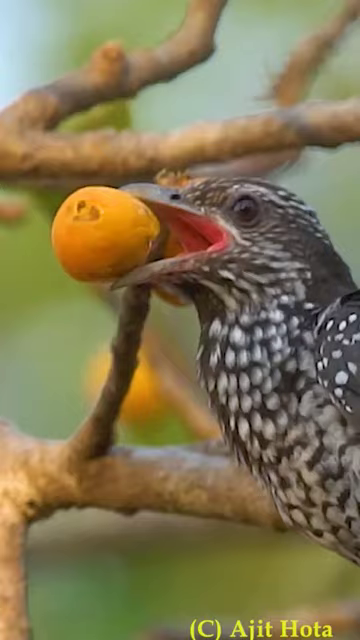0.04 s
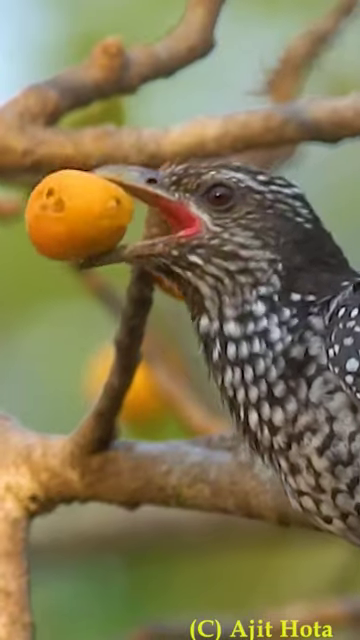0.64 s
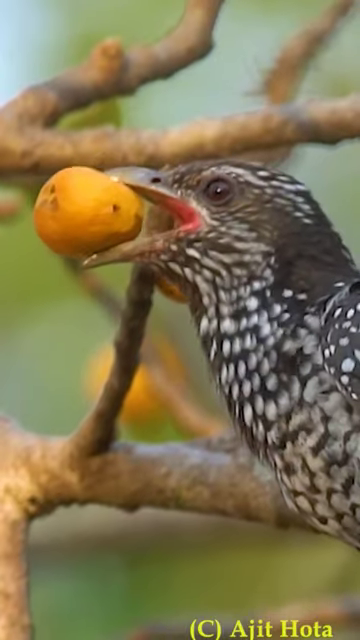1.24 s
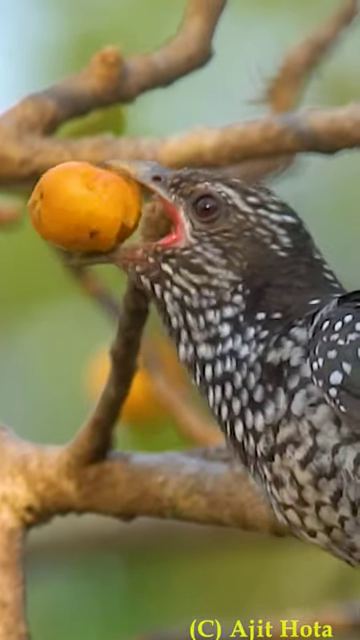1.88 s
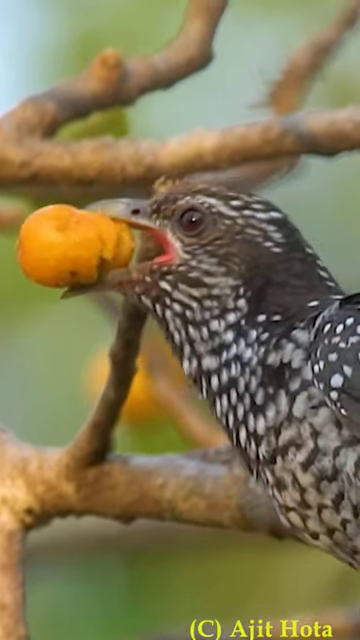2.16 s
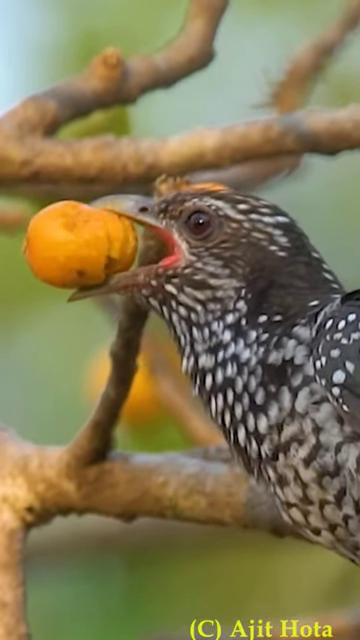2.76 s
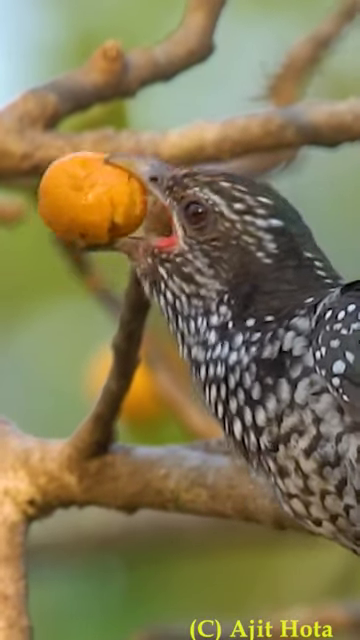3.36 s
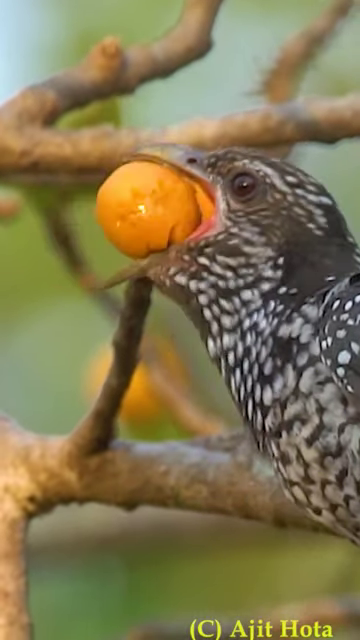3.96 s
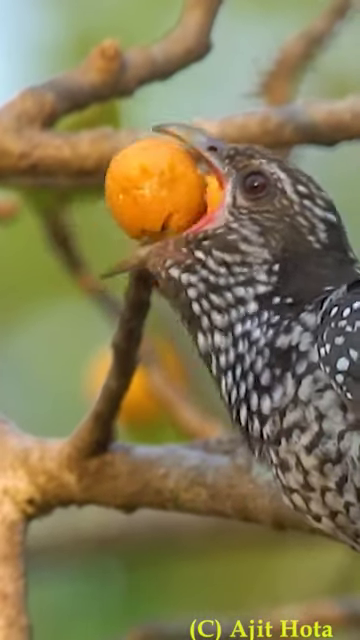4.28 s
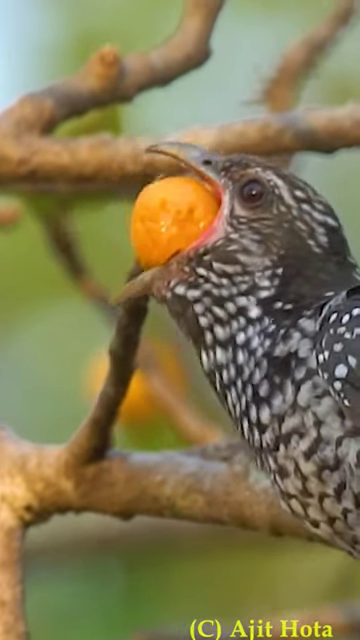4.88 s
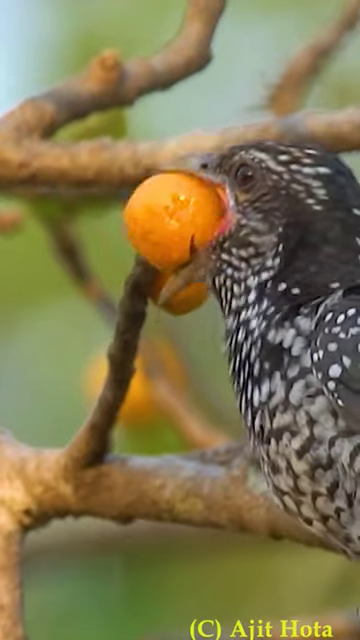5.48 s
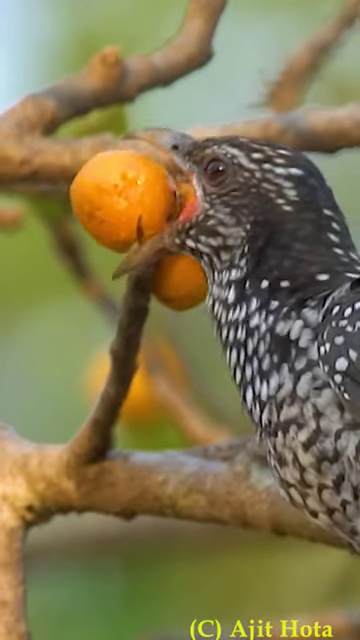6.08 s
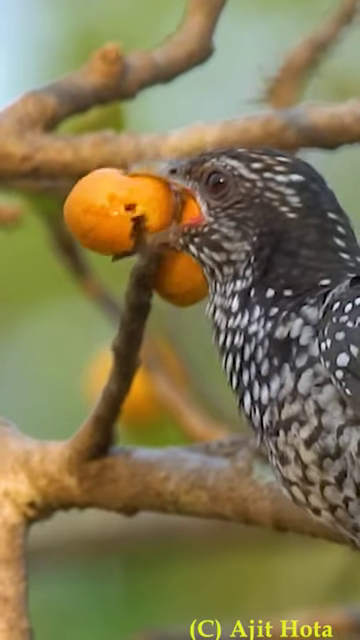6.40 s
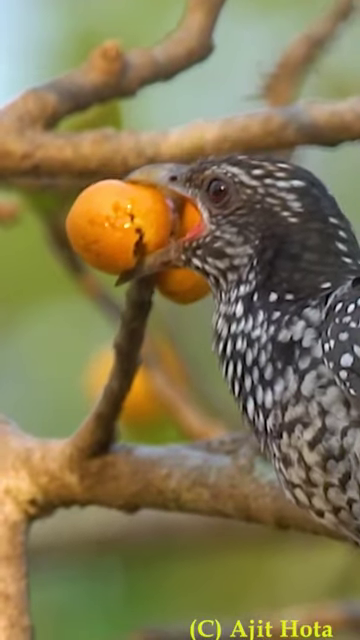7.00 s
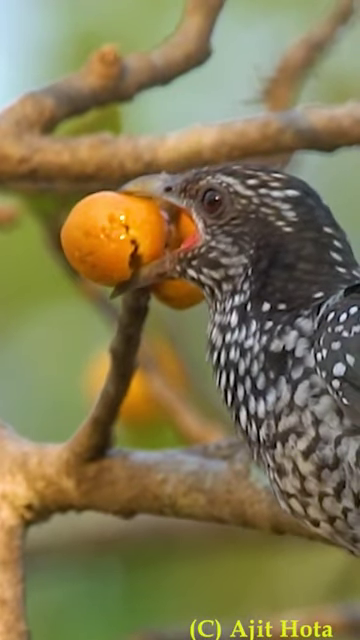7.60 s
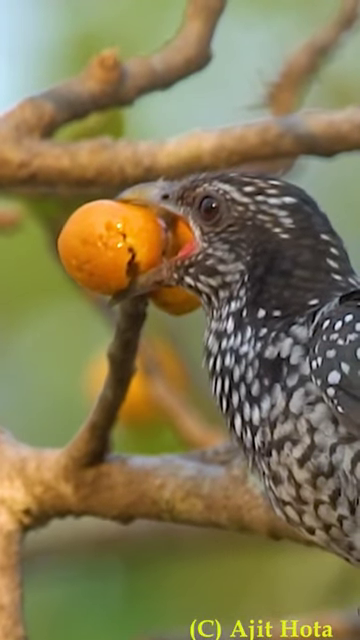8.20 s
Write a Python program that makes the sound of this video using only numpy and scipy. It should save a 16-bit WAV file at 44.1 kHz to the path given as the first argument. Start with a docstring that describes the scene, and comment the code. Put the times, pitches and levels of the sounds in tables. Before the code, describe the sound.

A cricket close by chirps quickly, pauses for several seconds, then returns with a longer run. Other crickets answer from farther off over a steady high insect chorus and hiss. Songbirds slur faint whistles among the trees, and long falling calls echo early and again late. One short low cluck comes midway, and a few dry ticks and soft rustles follow as a bird turns a fruit in its bill.

```python
"""A near cricket chirps in bouts, each chirp four falling strokes of scraper on file, in woodland where a
bird turns a fruit in its bill. Other crickets answer from farther off. Songbirds slur whistles among the
trees, and long falling calls echo off trunks and leaves. One low cluck, a few sharp ticks and soft puffs
of rustling sit on a bed of background hiss, a far hum and a steady insect chorus."""
import sys
import numpy as np
from scipy import signal
from scipy.fft import rfft, irfft
from scipy.io import wavfile
from scipy.ndimage import map_coordinates

SR = 44100
rng = np.random.default_rng(int(sys.argv[2]) if len(sys.argv) > 2 else 0)


def store_wav(level_fs):
    """Save 16-bit WAV to argv[1]."""
    pcm = np.round(np.clip(np.atleast_2d(level_fs), -1, 1) * 32767)
    wavfile.write(sys.argv[1], SR, pcm.T.astype(np.int16))


N = 363825
TIME = np.arange(N) / SR
FREQS = np.maximum(np.fft.rfftfreq(N, 1 / SR), 1)

# Levels are set ahead of each layer's own gain; pan is left minus right.
# near cricket's chirps: t/s of the first full stroke, stroke spacing/s, level/dB
NEAR_CHIRPS = [(.0892, .0358, -27.2), (.3497, .038, -27.7), (4.8025, .038, -29), (5.0717, .0358, -27.7),
               (5.335, .036, -28.3), (5.597, .036, -28.2), (5.8588, .0372, -28.7), (6.1558, .0366, -27.4)]
# higher cricket's chirps: t/s
HIGH_CHIRPS = [0.559, 1.476, 2.400, 3.278, 4.282, 5.278, 6.306, 7.219, 8.081]
# far cricket's bouts: start/s, end/s
FAR_BOUTS = [(.548, 1.55), (1.933, 2.95), (7.027, 8.25)]
# a small insect's thin double chips: t/s
INSECT_CHIPS = [1.604, 3.831, 4.32, 4.87, 5.473, 6.073, 6.703, 7.84]
# songbird slurs: t/s, length/s, start f/Hz, middle f/Hz, end f/Hz, level/dB, pan/dB
WHISTLES = [(0.061, 0.12, 2250, 2180, 2115, -55, 2), (0.103, 0.18, 2000, 1932, 1897, -54.5, 8),
            (0.323, .19, 2400, 2760, 2810, -59, 8), (0.511, 0.18, 3200, 3166, 3000, -60.5, 0),
            (.57, 0.054, 1800, 1747, 1730, -62, 0), (0.628, 0.29, 2950, 2866, 2730, -58.5, -8),
            (0.859, 0.063, 2800, 2650, 2330, -60, -4), (0.901, 0.089, 1810, 1764, 1680, -57.5, -2),
            (1.01, 0.13, 1330, 1471, 1360, -58, 10.5), (1.078, 0.19, 4060, 3940, 3930, -56.5, -2),
            (1.267, 0.19, 1800, 1880, 1890, -59.5, 7), (1.517, 0.072, 2835, 2560, 2470, -58, -3),
            (1.606, 0.06, 1480, 1364, 1240, -58, 8), (2.455, 0.12, 2050, 2216, 2215, -60, -6),
            (2.645, 0.07, 2048, 1762, 1490, -59, 0), (3.54, 0.4, 2232, 2777, 2470, -57.5, -8.5),
            (3.81, 0.15, 1800, 1858, 1814, -60.5, 0), (3.891, 0.047, 2550, 2880, 3060, -56, 5),
            (3.987, 0.049, 2800, 2680, 2580, -58, -9), (4.053, 0.16, 2860, 2600, 2633, -57.5, -13),
            (4.24, 0.24, 1690, 1927, 1974, -61, -1), (4.417, 0.28, 2300, 2625, 2510, -58, -9),
            (4.671, 0.11, 2620, 2382, 2130, -53.5, -13), (4.927, 0.12, 1780, 2020, 2095, -63, -6),
            (5.206, 0.12, 2080, 2480, 2550, -60, -15), (5.27, 0.19, 1280, 1416, 1486, -67.5, 6),
            (5.406, 0.13, 1700, 1990, 1815, -60.5, 0), (5.86, 0.14, 1400, 1507, 1500, -62.5, 8),
            (6.088, 0.057, 2600, 2800, 3160, -56, 6), (6.109, 0.18, 1790, 1963, 1930, -55.5, 2),
            (6.245, 0.14, 2843, 2596, 2610, -60, -2), (6.735, 0.11, 1850, 1820, 1790, -61, 4),
            (6.881, 0.065, 2750, 2704, 2735, -54.5, 0)]
# hoarse bird chirps that drop onto a low pitch: t/s, length/s, end f/Hz, level/dB
LOW_CHIRPS = [(1.479, 0.058, 990, -65.5), (6.42, 0.022, 1540, -59), (6.45, 0.034, 1185, -60),
              (6.55, 0.043, 1400, -59.5), (7.137, 0.014, 1503, -59), (7.167, 0.044, 1155, -59.5),
              (7.262, 0.041, 1367, -58), (7.303, 0.033, 2220, -58.5), (7.597, 0.058, 1870, -53),
              (7.86, 0.048, 1826, -53.5)]
# falling calls deep in the trees, one curve each: t/s, f/Hz, level/dB
FALLING_CALLS = [
    [(.63, 5700, -53), (.70, 4850, -48), (.82, 4080, -46), (.89, 3530, -49.5), (1.02, 3380, -64)],
    [(1.14, 3570, -51), (1.22, 3443, -45.5), (1.33, 3327, -46), (1.46, 3207, -41), (1.56, 2950, -47)],
    [(6.36, 5260, -47), (6.46, 4910, -44), (6.56, 4230, -33), (6.66, 3385, -44), (6.79, 3000, -49),
     (6.94, 2670, -60)],
]
# how each falling call carries: rasp/share of pitch, direct level/dB, echo t60/s
CALL_VOICES = [(0.057, -12, 1.4), (0.0127, -7, 1.17), (.04, -10, 1.86)]
# the cluck's harmonics, from the first up: level/dB
CLUCK_HARMONICS = [-11.5, 0, 0.5, -15]
# sharp ticks: t/s, level/dB, pan/dB
TICKS = [(2.326, -35, -9), (5.916, -39, 0), (6.048, -40.5, -6), (6.42, -45, -5), (6.823, -38.5, -2),
         (7.212, -39, 4), (7.654, -41, -6)]
# puffs of rustling: t/s, body level/dB, brush offset/dB
RUSTLE_PUFFS = [(2.35, -73.5, -4), (2.78, -69, -5), (3.08, -73, 3), (3.67, -70.5, -22), (3.87, -67.5, -4.5),
                (4.35, -75, -16), (4.99, -71.5, -10), (5.63, -75, 2), (6.05, -66.5, -6), (6.22, -71.5, -14),
                (6.30, -70.5, 1), (6.48, -72, -0.5), (6.57, -70.5, -3), (6.67, -66, -5), (6.82, -70, -4),
                (6.98, -67.5, -1), (7.22, -68, -5), (7.41, -67.5, -2), (7.71, -67, -6), (7.94, -71, 1.5)]
# tone of the background hiss: f/Hz, level/dB
HISS_SPECTRUM = [(25, -4.5), (100, -4.5), (300, -2), (450, -3), (800, -2.5), (1300, -1), (2000, 2.5),
                 (3400, 1.5), (4800, 0.5), (6500, -1), (8600, -4.5), (9100, -5.5), (13000, -11),
                 (15600, -15.5)]
# stereo image of the hiss: f/Hz, left-right correlation
HISS_CORRELATION = [(60, -0.11), (1400, 0.26), (3100, -0.2), (7000, 0.028)]
# level ride on the hiss, used about its mean and strongest in the treble: t/s, level/dB
HISS_SWELL = [(0.3, -62.5), (0.74, -65.5), (1.05, -64), (2.62, -62), (3.29, -57), (3.64, -62),
              (6.43, -63.5), (6.81, -61), (7.05, -60.5), (8.25, -65)]
# steady bands, a far hum and then the insect chorus: f/Hz, width/Hz, level/dB, left-right correlation
CHORUS_BANDS = [(537.6, 70, -65, 0.34), (4167, 460, -48.2, -0.34), (4770, 270, -58, -0.28),
                (5417, 310, -55.5, -0.14), (7953, 595, -54, 0.11), (11800, 1100, -65.5, -0.022)]


def near_cricket(stroke_s=.017, weak_stroke_db=-11, shortfall_kept=.15):
    """Swelling chirps off to the left; a faint low falling tone, like distortion, under each stroke."""
    song, undertone = np.zeros((2, N)), np.zeros((2, N))
    for full_stroke_s, gap_s, peak_db in NEAR_CHIRPS:
        for k in range(4):
            s = full_stroke_s + (k - 1) * gap_s - .0046
            db = peak_db + weak_stroke_db * shortfall_kept ** k  # opens weak, then fills out
            add(song, s, from_db(db) * falling_tone(hz=4227, fall_hz=547, length_s=stroke_s, lead=-1.1))
            low_tone = falling_tone(hz=317, fall_hz=480, length_s=stroke_s, lead=.55)
            add(undertone, s, from_db(db - 20) * low_tone)
    direct = song + undertone
    echoes = wood_echo(direct[0], t60=.075, build_s=.001)
    return from_db(-2.5) * direct * panned(4.5) + from_db(-7.5) * echoes * panned(-2)


def falling_tone(hz, fall_hz, length_s, lead):
    """A pip that sags, as a wing stroke does when the file slows; left is ahead by lead radians."""
    u = np.linspace(0, 1, int(length_s * SR))
    pitch = (hz + fall_hz * (.5 - u)) * (1 + .005 * wander(len(u), 600))
    phase = 2 * np.pi * (np.cumsum(pitch) / SR + rng.random())
    grain = from_db(1.2 * wander(len(u), 500))  # in a wing stroke, the scraper's uneven grip
    envelope = np.sin(np.pi * u) ** 1.1 * grain
    return envelope * np.sin(phase + np.array([[lead], [0]]))


def stridulation(starts, db, strokes, gap_s, wet_db, **stroke):
    """Chirps made of short rows of nearly equal wing strokes, with a tight echo."""
    out = np.zeros((2, N))
    for s in starts:
        for k in range(strokes):
            add(out, s + k * gap_s, from_db(db + rng.normal(0, 1)) * falling_tone(**stroke))
    return out + from_db(wet_db) * wood_echo(out[0], t60=.075, build_s=.0052)


def answering_insects(far_period_s=.289, aside_rad=2.7):
    """Two crickets far off to one side, nearly out of phase left to right, and a small insect's chips."""
    high = stridulation(HIGH_CHIRPS, db=-40.5, strokes=4, gap_s=.0405, wet_db=-7,
                        hz=5610, fall_hz=593, length_s=.0175, lead=aside_rad)
    far_chirps = np.concatenate([np.arange(start, end, far_period_s) for start, end in FAR_BOUTS])
    far = stridulation(far_chirps, db=-43, strokes=2, gap_s=.024, wet_db=-9.5,
                       hz=4630, fall_hz=450, length_s=.02, lead=aside_rad)
    chips = stridulation(INSECT_CHIPS, db=-52.5, strokes=2, gap_s=.031, wet_db=4.5,
                         hz=7460, fall_hz=905, length_s=.0275, lead=.59)
    return high + far * panned(-3.2) + chips


def songbirds(chirp_drop=.154):
    """Slurred whistles from both sides and short low chirps, ringing through the wood."""
    song, chirps = np.zeros((2, N)), np.zeros((2, N))
    for s, length_s, from_hz, middle_hz, to_hz, db, pan_db in WHISTLES:
        add(song, s, from_db(db) * panned(pan_db) * whistle(length_s, from_hz, middle_hz, to_hz))
    for s, length_s, hz, db in LOW_CHIRPS:
        chirp = whistle(length_s, hz * (1 + chirp_drop), hz * (1 + chirp_drop / 4), hz, rasp=.073)
        add(chirps, s, from_db(db) * chirp)
    send = from_db(-.6) * song.mean(0) + from_db(-2) * chirps.mean(0)
    echo = wood_echo(send, t60=1.0, build_s=.0026)
    return from_db(7) * (from_db(-.5) * (song + chirps) + echo)


def whistle(length_s, from_hz, middle_hz, to_hz, waver=.0119, rasp=.035, flutter_db=3.5):
    """A wavering note arcing through three pitches, hoarse where it slides steeply."""
    u = np.linspace(-1, 1, max(int(length_s * SR), 64))
    arc = middle_hz + (to_hz - from_hz) / 2 * u + ((to_hz + from_hz) / 2 - middle_hz) * u ** 2
    steepness = np.tanh(np.abs(np.gradient(arc)) * SR / 7000)
    pitch = arc * (1 + waver * wander(len(u), 83.7) + rasp * steepness * wander(len(u), 449))
    envelope = from_db(flutter_db * wander(len(u), 87.5)) * signal.windows.tukey(len(u), .3)
    return envelope * np.sin(2 * np.pi * np.cumsum(pitch) / SR + np.array([[1.1], [0]]))


def falling_calls(overtone_db=-22):
    """Long whistles that turn harsh as they grow loud; the farther the bird, the wetter the call."""
    out = np.zeros((2, N))
    for call, (rasp, direct_db, t60) in zip(FALLING_CALLS, CALL_VOICES):
        s, hz, level_db = np.transpose(call)
        t, voice = np.arange(s[0], s[-1], 1 / SR), np.zeros(N)
        effort = from_db(np.interp(t, s, level_db)) * signal.windows.tukey(len(t), .1)
        pitch = np.interp(t, s, hz) * (1 + rasp * effort / effort.max() * wander(len(t), 350))
        ragged = from_db(3 * wander(len(t), 55) - 1)
        phase = 2 * np.pi * np.cumsum(pitch) / SR
        add(voice, s[0], effort * ragged * (np.sin(phase) + from_db(overtone_db) * np.sin(2 * phase)))
        out += from_db(direct_db) * voice + wood_echo(voice, t60=t60, build_s=.0066)
    return from_db(2.8) * out


def cluck(start_s=4.1, pitch_hz=378, attack_s=.007, decay_s=.011):
    """One short, hoarse, fairly dry note, strongest in its third harmonic."""
    t, out = TIME[:SR // 10], np.zeros(N)
    phase = 2 * np.pi * np.cumsum(pitch_hz * (1 + .14 * wander(len(t), 520))) / SR
    note = sum(from_db(db) * np.sin(k * phase + rng.uniform(0, 2 * np.pi))
               for k, db in enumerate(CLUCK_HARMONICS, 1))
    envelope = (1 - np.exp(-(t / attack_s) ** 2)) * np.exp(-t / decay_s)
    add(out, start_s, from_db(-29) * note * envelope)
    return out * panned(-1) + from_db(-11) * wood_echo(out, t60=.22, build_s=.005)


def ticks(snap_s=.0018, tail_s=.018, tail_db=-16):
    """Dry, bright snaps of noise with a brief splintering tail."""
    envelope, t = np.zeros((2, N)), TIME[:SR // 10]
    snap = np.exp(-t / snap_s) + from_db(tail_db) * np.exp(-t / tail_s)
    for s, db, pan_db in TICKS:
        add(envelope, s, from_db(db) * panned(pan_db) * snap)
    return envelope * noise(band(4400, 6200), correlation=.42)


def rustling(width_s=.033):
    """Soft puffs of noise with a dull body and a lighter brush on top."""
    body, brush = np.zeros(N), np.zeros(N)
    for s, db, brush_db in RUSTLE_PUFFS:
        puff = np.exp(-np.minimum(((TIME - s) / width_s) ** 2 / 2, 50))
        body += from_db(db) * puff
        brush += from_db(db + brush_db) * puff
    return (from_db(11) * body * noise(band(292, 296), correlation=.77)
            + from_db(13.5) * brush * noise(band(950, 560), correlation=.23))


def distant_warblers(count=80, centre_hz=2200, span_octaves=.81, slur=.1454):
    """Birds too far off to follow: stray notes that arrive only as echo."""
    notes = np.zeros(N)
    for k, (when, length, height, bend) in enumerate(rng.random((count, 4))):
        hz = centre_hz * 2 ** (span_octaves * (height - .5))
        note = whistle(.0582 + .1223 * length, hz * (1 + slur * (2 * bend - 1)), hz, hz)[0]
        add(notes, (k + when) / count * N / SR, note)
    return from_db(-62) * wood_echo(notes, t60=.25, build_s=.0056)


def background_hiss(fade_span_s=(1.74, 2.324), fade_db=-3.5, crossover_hz=6000):
    """Hiss with a swelling treble; once it fades slightly, then steps back up abruptly, as at an edit."""
    swell_db = np.interp(TIME, *np.transpose(HISS_SWELL))
    swell_db -= swell_db.mean()
    dip_db = np.interp(TIME, fade_span_s, [0, fade_db], right=0)
    hiss = from_db(-50.5 + dip_db) * noise(from_db(at_hz(HISS_SPECTRUM)), at_hz(HISS_CORRELATION))
    body = signal.sosfiltfilt(signal.butter(2, crossover_hz, fs=SR, output="sos"), hiss)
    treble = hiss - body
    return body * from_db(.85 + .29 * swell_db) + treble * from_db(-2 + 1.27 * swell_db)


def chorus():
    """A far hum and countless far insects, blurred into noise bands that each shimmer on their own."""
    out = np.zeros((2, N))
    for hz, width_hz, db, correlation in CHORUS_BANDS:
        shimmer_db = 1.1 * wander(N, 50) + .3 * wander(N, 4.4)
        out += noise(band(hz, width_hz), correlation) * from_db(db + shimmer_db)
    return out


def wood_echo(x, t60, build_s):
    """Countless echoes off trunks and leaves: a unit-energy stereo tail that builds and dies away."""
    t = TIME[:2 * SR]
    tail = rng.standard_normal((2, len(t))) * from_db(-60 * t / t60) * (1 - np.exp(-t / build_s))
    tail /= np.sqrt(np.sum(tail ** 2, axis=1, keepdims=True))
    return signal.fftconvolve(np.atleast_2d(x), tail, axes=1)[:, :N]


def noise(spectrum, correlation):
    """Stereo noise at unit rms with a given spectrum and left-right correlation."""
    mid, side = rfft(rng.standard_normal((2, N)))
    correlation = np.clip(correlation, -.99, .99)
    stereo = np.sqrt(1 + correlation) * mid + np.sqrt(1 - correlation) * side * [[1], [-1]]
    x = irfft(spectrum * stereo, N)
    return x / np.sqrt(np.mean(x ** 2) + 1e-20)


def band(hz, width_hz):
    """Gain curve of a resonance applied twice."""
    return 1 / (1 + ((FREQS ** 2 - hz ** 2) / (FREQS * width_hz * np.pi / 2)) ** 2)


def wander(size, rate_hz):
    """Smooth random modulation with a spread of about 1."""
    knots = rng.standard_normal(1024)
    return map_coordinates(knots, [np.arange(size) / SR * rate_hz], order=2, mode="wrap")


def at_hz(points):
    """A table read along log frequency."""
    hz, value = np.transpose(points)
    return np.interp(np.log(FREQS), np.log(hz), value)


def from_db(db):
    """Decibels to gain."""
    return 10 ** (np.asarray(db) / 20)


def panned(pan_db):
    """Left and right gains; positive leans left."""
    return from_db(np.array([[pan_db], [-pan_db]]) / 2)


def add(out, s, sound):
    """Mix a sound in at s seconds."""
    i = max(round(s * SR), 0)
    part = sound[..., :max(N - i, 0)]
    out[..., i:i + part.shape[-1]] += part


def scene():
    """Crickets up front, birds and small noises around them, hiss and chorus behind."""
    insects = answering_insects() + near_cricket()
    birds = songbirds() + distant_warblers() + falling_calls() + cluck()
    return insects + birds + ticks() + (rustling() + background_hiss() + chorus()) * panned(-.93)


def record(dry, start_s=.082, cutoff_hz=15700):
    """The mix cuts in after a moment of silence, through a steep low-pass."""
    lowpass = signal.ellip(12, .1, 70, cutoff_hz, fs=SR, output="sos")
    return signal.sosfilt(lowpass, dry * (TIME >= start_s))


dry = scene()
out = record(dry)
store_wav(out)
```